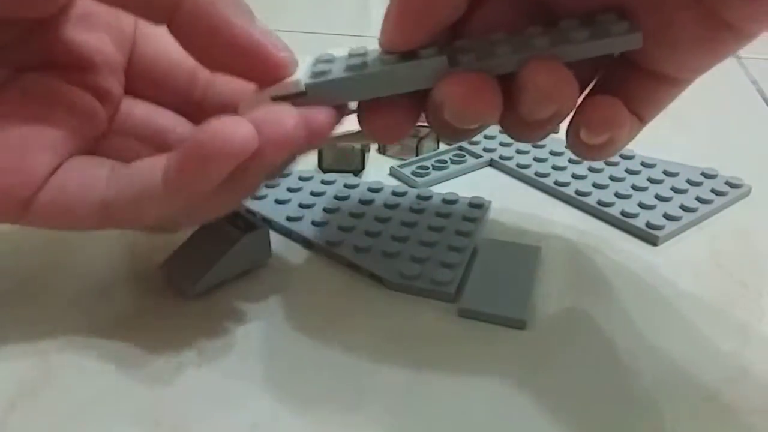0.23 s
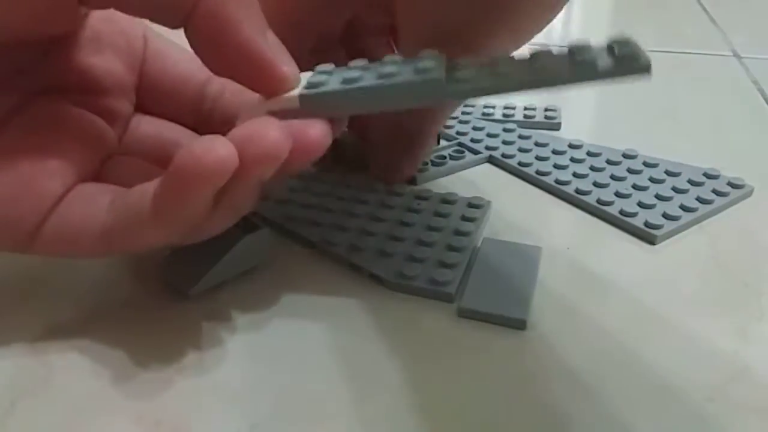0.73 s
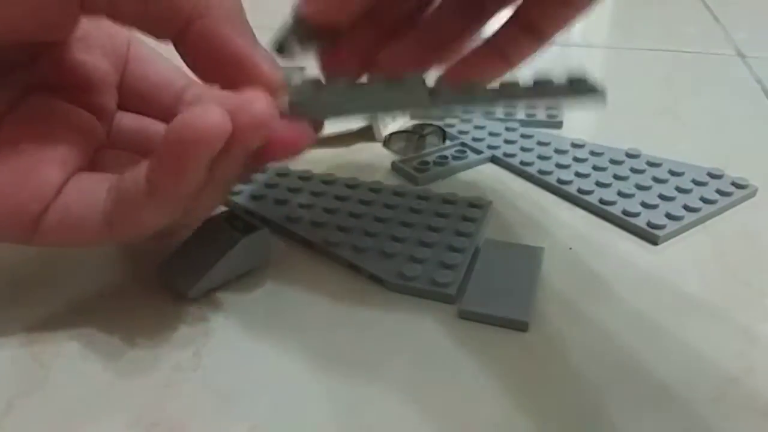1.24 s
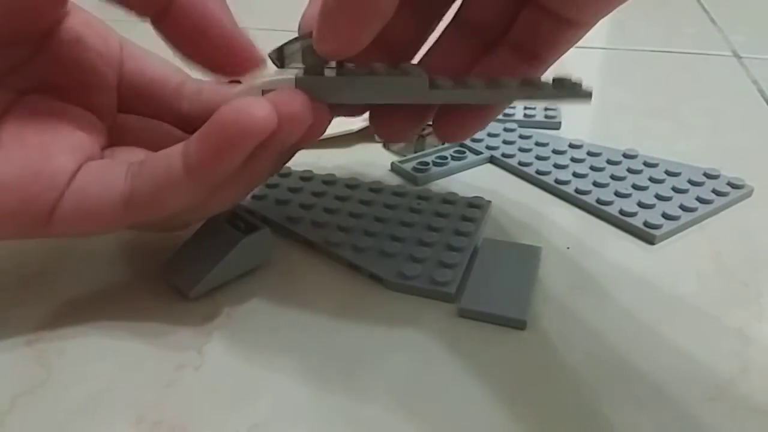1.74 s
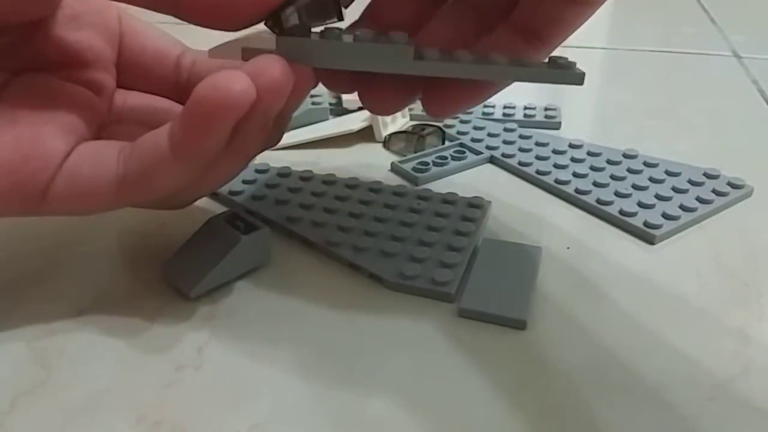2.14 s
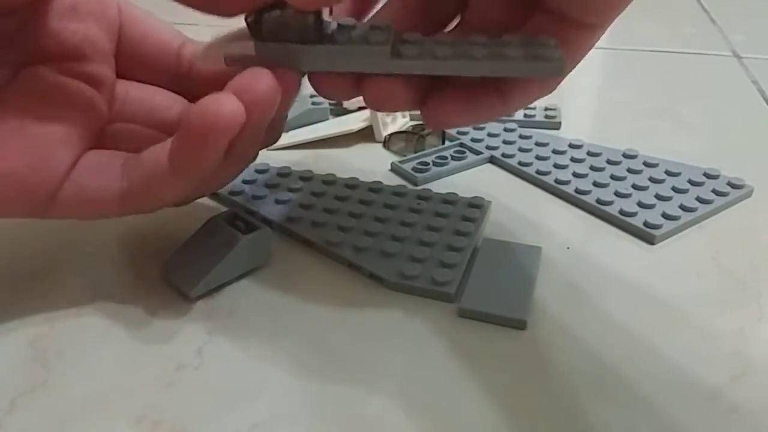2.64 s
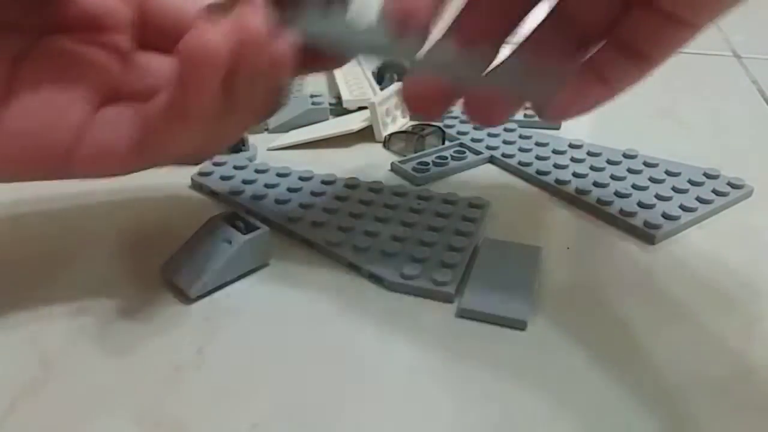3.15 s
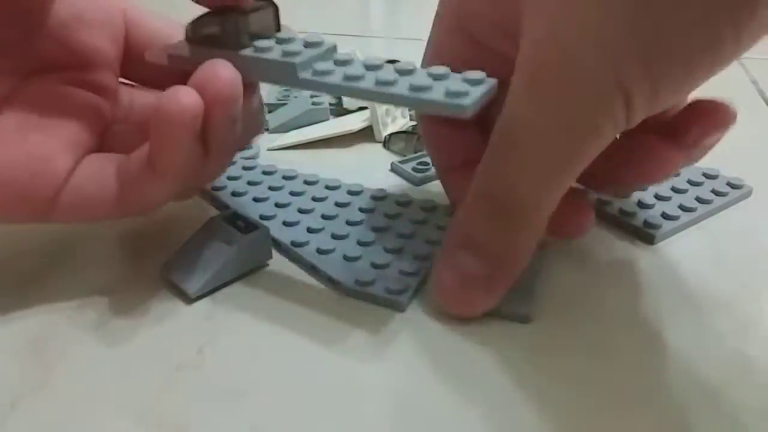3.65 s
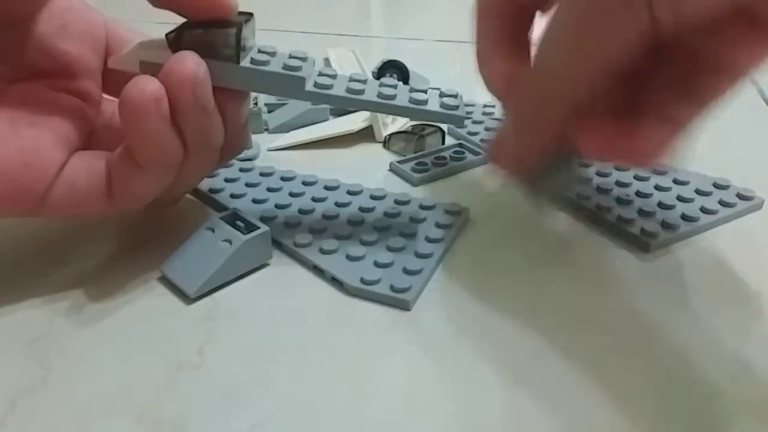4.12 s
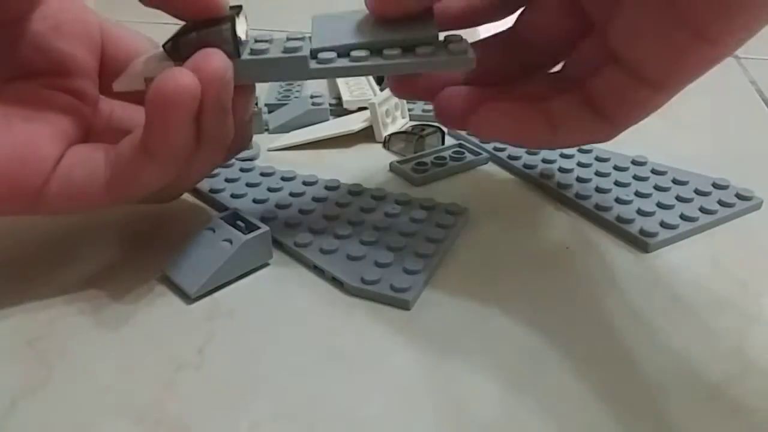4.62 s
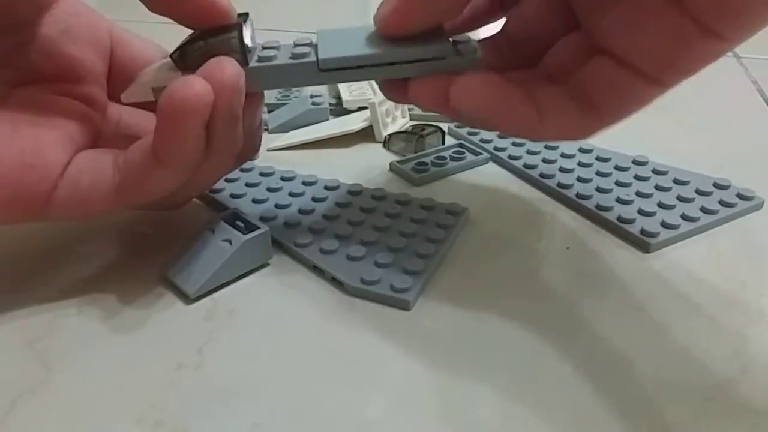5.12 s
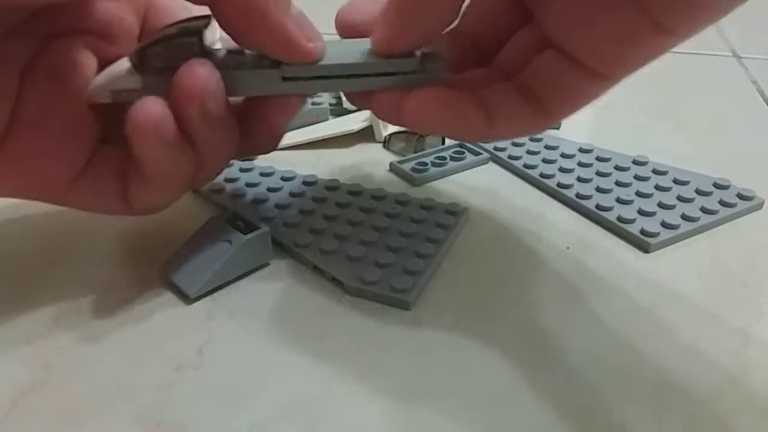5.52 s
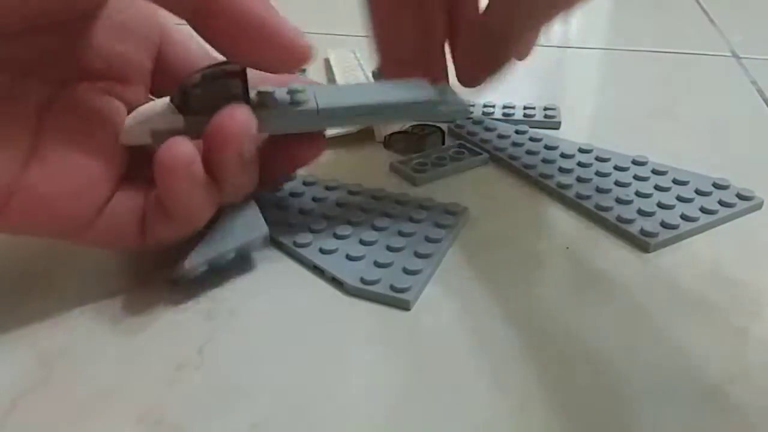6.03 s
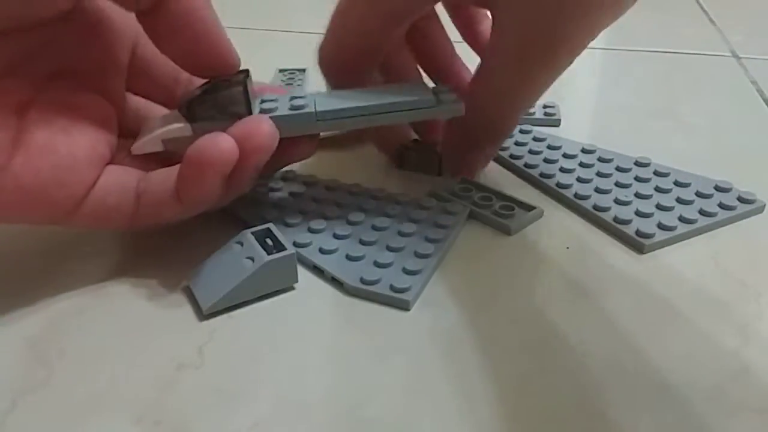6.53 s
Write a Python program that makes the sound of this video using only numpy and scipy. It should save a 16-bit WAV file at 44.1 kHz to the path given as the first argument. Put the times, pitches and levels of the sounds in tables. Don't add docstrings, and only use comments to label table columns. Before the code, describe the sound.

Toy plastic bricks are handled close to a stereo phone microphone in a quiet tiled room. A sharp clack comes early, then sparse ticks, a soft low scrape and chatter of a plate dragged on the floor, a bright snap as it presses home, and a rapid clattering cluster of pieces. Faint hum, distant motor and hiss lie underneath.

```python
import sys
import numpy as np
from scipy import signal
from scipy.fft import rfft, irfft, next_fast_len
from scipy.io import wavfile
from scipy.ndimage import uniform_filter1d

SR = 44100
rng = np.random.default_rng(int(sys.argv[2]) if len(sys.argv) > 2 else 0)


def boost(x):
    u = np.asarray(x, float) / 20
    return 10 ** u


def master(y):
    cut = np.clip(np.atleast_2d(y).T, -1, 1)
    pcm = np.round(cut * 32767)
    wavfile.write(sys.argv[1], SR, pcm.astype(np.int16))


N = 298557
T = np.arange(N) / SR

# start_s, peak_db, pitch_hz (strongest mode), body_modes_db, shell_modes_db
PILE_CLICKS = [(0.5434, -8.5, 7450, -8, 8), (0.683, -30.5, 7970, -27, -7), (0.6974, -32, 6500, -40, -8),
               (0.7174, -37, 4840, -16, -14), (0.7231, -28, 2010, -3.5, -12),
               (0.7626, -36.5, 2020, 9.5, 3.5), (1.29, -27.5, 5320, -7, -2), (1.3125, -31.5, 12350, -8, -7),
               (1.488, -48, 4250, 6.5, 6), (1.6021, -35, 5540, -28, -11), (1.6433, -23.5, 5790, -20.5, -5),
               (1.7465, -36.5, 5780, -33, -18)]
PLATE_CLICKS = [
    (3.5356, -33.5, 1690, -8, -21.5),
    (3.5442, -39, 1740, 20, -11),
    (3.5879, -33, 3080, 17, 2),
    (3.6368, -32, 3726, -13, -19.5),
    (3.7593, -45, 1900, -19, -24),
    (3.7722, -37.5, 6180, -5, -6),
    (3.8136, -43, 2090, -12, -6),
    (3.8432, -41.5, 1830, 10, 5),
    (3.9171, -30, 1970, -1, -9),
    (3.9914, -52, 7460, -42, -8),
]
TUMBLE_CLICKS = [(6.082, -22, 8880, -12, -10), (6.0954, -31, 7430, -9.5, -7.5),
                 (6.1054, -44.5, 7350, -13.5, -12), (6.1501, -38.5, 2440, -9.5, -23.5),
                 (6.1581, -38, 2640, -4.5, -24.5), (6.1664, -38.5, 4270, -16, -16),
                 (6.2018, -8, 6680, -17, 3), (6.2137, -15, 11360, -6, -18), (6.2234, -34, 2700, -4, -10.5),
                 (6.2369, -9, 6450, -47.5, -0.5), (6.2462, -23, 5670, -28, -10),
                 (6.2541, -37, 5630, -28.5, -14), (6.2598, -20, 5830, -49, 2),
                 (6.2626, -14, 7170, -61.5, 4.5), (6.371, -37.5, 3750, -3.5, 1.5),
                 (6.559, -53, 2680, -10, -20)]
FIDGET_CLICKS = [(0.0153, -18, 8240, -17, -18), (0.199, -51, 6000, -12, -1), (0.3337, -47, 7660, -17, -22),
                 (0.362, -42.5, 11700, -39, -14), (1.8392, -49.5, 5740, -26, -25),
                 (1.8967, -46.5, 5570, -33, -17.5), (1.9056, -54, 5770, -31, -1),
                 (1.9355, -43, 5640, -38, -33), (2.0458, -50, 5196, -14, -23),
                 (2.9772, -47.5, 8100, -5, -4.5), (3.1, -49, 11700, -16.5, -14),
                 (3.3483, -48.5, 7560, -35.5, -21.5), (3.357, -43.5, 9340, -34, -12)]
PRESS_CLICKS = [(4.4754, -27.5, 8460, -19, -8), (4.4974, -38.5, 3570, -15.5, -5),
                (4.8576, -42.5, 4480, 2.5, 1), (4.9671, -36, 3460, -13, 2.5), (4.9948, -36, 3940, -10, 0),
                (5.0588, -19, 9080, -22, -9), (5.0948, -35.5, 7460, -9, 1), (5.1565, -22, 8370, -53, -15),
                (5.1979, -6, 9070, -54, -1.5), (5.479, -55, 9260, -23.5, -12.5),
                (5.8232, -56, 1500, -3, 0.5), (5.909, -54.5, 8000, -25, -5),
                (5.939, -56.5, 10500, -29, -8.5), (5.8515, -35, 8500, -24, -8.5),
                (5.859, -37, 10820, -45, -15.5), (6.5324, -29.5, 11370, 0, -1)]
BOUNCE_CLICKS = [(.0181, -20, 7890, -14, -12), (.0212, -31, 5260, -12, -8), (.5455, -23, 5080, -20, -8),
                 (5.1994, -15, 9280, -30, -18), (6.2007, -28, 7500, -40, -10),
                 (6.2062, -24, 5900, -25, -10), (6.2172, -19, 8400, -15, -4),
                 (6.2155, -16, 11300, -18, -12), (6.211, -26, 3900, -12, -8), (4.9805, -44, 9000, -15, -3),
                 (6.111, -40, 8800, -10, -3), (5.1745, -44, 7700, -30, -8), (3.5635, -45, 2100, -3, -24),
                 (3.898, -52, 2560, -3, -18), (6.687, -56, 5600, -30, -20), (5.838, -52, 7000, -25, -5)]

# start_s, pitch_hz, level_db, t60_s further modes of struck parts that
PART_RINGS = [(.5432, 2900, -22.5, 0.0051), (.5432, 12900, -24, .008), (1.643, 2450, -40, 0.012),
              (3.10, 2110, -71.5, .061), (3.36, 2110, -70, 0.056), (3.5885, 6200, -30.5, 0.0066),
              (3.917, 1170, -51, 0.07), (5.1981, 7880, -12, 0.008), (5.1982, 12800, -24, 0.015),
              (6.196, 4600, -35, 0.011), (6.2091, 8370, -26, 0.042), (6.2138, 13900, -14.5, .016),
              (6.2138, 3920, -25.5, 0.027), (6.2386, 5645, -25, .045), (6.2642, 11300, -21, 0.018),
              (6.532, 14000, -41, 0.028), (6.2635, 6840, -20, 0.025), (6.247, 5645, -36, 0.064),
              (6.0815, 8900, -34, 0.038), (6.533, 11100, -42.5, 0.02), (3.6372, 3690, -37, .035),
              (4.4755, 12800, -36, .012), (.7235, 2030, -36, .025),
              (1.2902, 6270, -40, .012), (1.2902, 2120, -44, .015), (1.2902, 3900, -45, .012),
              (1.6435, 5160, -36, .015), (1.6435, 9710, -36, .008), (1.6023, 6100, -46, .012),
              (1.7467, 5060, -45, .013), (1.8394, 5100, -58, .012), (1.8969, 5100, -56, .012),
              (1.9357, 5100, -52, .012), (1.9357, 6090, -51, .012), (.0154, 9120, -30, .01),
              (.0154, 13100, -38, .012), (.0154, 5260, -38, .01), (.5446, 5080, -27, .016),
              (.5434, 6830, -29, .012), (6.2148, 11300, -20, .02), (6.2018, 14300, -24, .015),
              (3.5358, 2100, -46, .03), (3.5358, 2700, -49, .03), (3.5358, 3340, -50, .025),
              (3.5885, 1900, -48, .03), (3.6375, 1850, -47, .03), (3.7595, 1900, -54, .05),
              (3.9175, 2800, -46, .02), (3.9175, 3600, -48, .02), (6.535, 14050, -58, .2),
              (6.535, 11100, -60, .18), (.13, 5700, -66, .12), (6.2372, 9200, -30, .03),
              (6.2635, 9200, -38, .07), (.7235, 3900, -45, .02), (.7185, 11500, -48, .015),
              (6.2018, 11800, -26, .03), (6.082, 7300, -40, .03)]
SINGING_LINES = [
    (3.645, 3690, -57, .4),
    (5.208, 9300, -48, .38),
    (6.245, 5650, -45.5, .45),
    (6.22, 11280, -48, .35),
]
KNUCKLE_THUMPS = [
    (.543, 447, -32, 0.024),
    (.543, 250, -37, .03),
    (5.198, 197, -55, 0.072),
    (6.2137, 414, -48, 0.035),
    (6.2137, 750, -48, .04),
    (3.536, 700, -58, .05),
]

# start_s, length_s, peak_share (0-1 of length), peak_db, rubbing_part (0 body, 1 edge, 2 skin)
SLIDES = [(0, 0.25, .1, -66, 1.05), (.68, 0.13, .25, -65, 2), (1.78, .22, 0.47, -72, .9),
          (3.335, 0.059, 0.36, -64.5, 1.36), (3.535, 0.08, 0.34, -59, .02), (3.59, 0.079, .5, -62, 0.55),
          (3.73, 0.11, .4, -68.5, .1), (3.78, 0.098, 0.3, -69, 1.05), (3.885, 0.092, 0.22, -56, .1),
          (3.95, .09, 0.6, -64.5, 1.3), (4.12, 0.13, .45, -73.5, 2.3), (4.965, 0.08, .1, -71.5, 0.35),
          (4.976, 0.029, 0.55, -52, 1.1), (6.53, 0.041, 0.77, -60, .1), (5.061, 0.098, .7, -76, 1.6),
          (5.822, 0.054, .5, -63.5, 1.8), (6.015, .055, 0.43, -71, .85), (6.14, 0.062, 0.37, -53, 0.2),
          (6.2, 0.092, .3, -54, .1)]
# pitch_hz, level_db
RUB_COLOURS = [
    [(400, -24), (1100, -9), (1900, 1), (2400, -10), (2900, -6), (3700, 1), (4500, -12), (8000, -50.5)],
    [(2500, -41), (4500, -7.5), (6200, -0.5), (8200, -2), (9500, -10.5), (13000, -41)],
    [(6100, -41.5), (9600, -5), (12500, 0), (15200, -1), (16300, -40)],
]
# start_s, left_over_right_db
HAND_PLACES = [(0, 3.5), (.6, 1.5), (1.4, 2.5), (2, .5), (3.55, 1.5), (3.7, 0), (4.5, .5), (5.2, -1.5),
               (6.1, 0), (6.77, -.5)]

# pitch_hz, level_db
TAIL_COLOUR = [(200, 4.5), (1000, 1), (4000, -4.5), (8000, -7), (11000, -6), (13500, -5), (16000, -5)]
# pitch_hz, t60_s
TAIL_T60 = [(300, 0.17), (2000, 0.33), (6000, 0.39), (10000, .36), (13000, .3), (16000, 0.24)]
# delay_s, level_db
WALL_ECHOES = [
    (0.0163, 8.5),
    (0.0216, -1),
    (0.031, -4),
    (0.037, -0.5),
]

# peak_s, end_s, firing_hz, peak_db, fade_db_per_s
THROTTLE = [
    (0, 0.723, 44.86, -61, 28),
    (0.835, 1.35, 40.03, -65.5, 31.5),
    (1.6, 1.805, 40.82, -63.5, 45),
    (1.952, 2.404, 49, -67, 11),
]
# pitch_hz, level_db
HOUSE_MODES = [(85, -27), (98, -4.5), (135, -18.5), (160, 4), (180, 2.5), (200, -10), (225, -18),
               (247, -7.5), (294, -5), (318, -13.5), (340, -6), (362, -18.5), (400, -9), (450, -22.5)]
# start_s, end_s, pitch_hz, level_db
PIPE_WHINES = [
    (3.899, 4.1, 402, -80),
    (3.91, 4.103, 548, -74.5),
    (4.22, 4.797, 278.2, -74),
]
# start_s, level_db
RUMBLE_SWELL = [(0, -64.5), (.7, -61.5), (2.3, -68), (3.2, -72.5), (3.8, -67.5), (5.6, -69.5), (6.5, -68.5),
                (6.77, -71)]
# pitch_hz, level_db_per_hz
STREET_COLOUR = [(82, -29), (140, -3), (152, -15), (269, -19), (417, -25.5), (519, -30.5), (1500, -46.5),
                 (1950, -77)]
# pitch_hz, level_db_per_hz
DEEP_COLOUR = [(15, -62), (30, -16), (42, -2), (65, 0.5), (100, -3), (150, 0), (220, -32), (400, -81.5)]
# pitch_hz, level_db_per_hz
MIC_COLOUR = [(400, -31), (700, -8.5), (1500, -8), (3000, -10), (6000, -11), (10000, -12), (13500, -9),
              (16000, -12.5)]
# pitch_hz, level_db
FAINT_TOP = [(15650, 0), (15900, -40)]
# pitch_hz, level_db
PHONE_TOP = [(16500, 0), (16900, -70)]


def on_log(hz, table):
    points = np.array(table)
    return np.interp(np.log(np.maximum(hz, 1)), np.log(points[:, 0]), points[:, 1])


def level(x, db):
    return x * boost(db) / np.sqrt(np.mean(x ** 2))


def colour(x, table):
    n = next_fast_len(x.shape[-1])
    hz = np.arange(n // 2 + 1) * SR / n
    return irfft(rfft(x, n) * boost(on_log(hz, table)), n)[..., :x.shape[-1]]


def stereo_noise(table, alike_hz):
    mid, side = rng.standard_normal((2, N))
    side = colour(side, [(alike_hz / 8, -18), (alike_hz, 0)])
    return colour(np.array([mid + side, mid - side]), table)


def walk(rate):
    hold = int(SR / rate)
    steps = np.repeat(rng.standard_normal(N // hold + 1), hold)
    return 1.1 * uniform_filter1d(uniform_filter1d(steps, hold), hold)[:N]


def onset(x):
    x = np.minimum(x, 1)
    return x * x * (3 - 2 * x)


def add(out, start_s, x, lag):
    for channel, late in enumerate((max(lag, 0), max(-lag, 0))):
        i = int(start_s * SR) + late
        out[channel, i:i + x.shape[1]] += x[channel, :N - i]


def clicks(table, top_db, t60, low_t60, skew, left_db, lag, count=80):
    out = np.zeros((2, N))
    t = np.arange(900) / SR
    sides = np.array([[1], [-1]])
    for (start_s, db, hz, low_db, mid_db), u in zip(table, rng.random((len(table), 5, count))):
        f = 600 + 15900 * ((np.arange(count) + u[0]) / count) ** 1.5
        high_db = mid_db + top_db + 1.5 * np.log2(hz / 6000)
        base_db = on_log(f, [(600, low_db - 26), (1200, low_db - 9), (1700, low_db - 2), (2500, low_db),
                             (5500, mid_db + 1.5), (8000, mid_db), (13000, high_db),
                             (14500, high_db - 1.5), (16500, high_db - 12.5)])
        gain = boost(base_db) + np.exp(-.5 * (np.log(f / hz) / 0.063) ** 2)
        age = np.maximum(t - .002 * u[1][:, None] ** 6, 0)
        decay_s = on_log(f, [(1000, low_t60), (6000, t60)]) * (0.47 + 1.1 * u[2])
        turn = 0.39 * u[3] + skew * np.minimum(f / 3000, 1) * (u[4] - .5) * sides
        wave = np.sin(2 * np.pi * (f[:, None] * age + turn[:, :, None]))
        wave = wave * onset(age * f[:, None] / 1.6)
        fade = np.exp(-np.log(1000) * age / decay_s[:, None])
        x = np.sum(gain[:, None] * fade * wave, axis=1)
        x = x * (1 + 2.1 * np.exp(-t / 0.00098))
        x = x / np.abs(x).max(axis=1, keepdims=True)
        add(out, start_s, x * boost(db + left_db * sides), lag)
    return out


def floor_contacts():
    floor = dict(t60=0.014, low_t60=0.04, skew=0.57, lag=-6)
    pile = clicks(PILE_CLICKS, top_db=-10.5, left_db=0.05, **floor)
    plate = clicks(PLATE_CLICKS, top_db=-22, left_db=0.1, **floor)
    tumble = clicks(TUMBLE_CLICKS, top_db=-4.5, left_db=-0.13, **floor)
    return pile + plate + tumble


def hand_contacts():
    held = dict(t60=0.0052, low_t60=0.011, skew=0.51, lag=8)
    fidget = clicks(FIDGET_CLICKS, top_db=-4, left_db=-0.2, **held)
    press = clicks(PRESS_CLICKS, top_db=-9, left_db=0.1, **held)
    bounce = clicks(BOUNCE_CLICKS, top_db=-8, left_db=0.1, **held)
    return fidget + press + bounce


def rings(table, left_db, lag):
    out = np.zeros((2, N))
    rock_db = 4.5 * walk(160)
    for k, (start_s, hz, db, t60) in enumerate(table):
        t = T[:int(min(t60, .3) * SR) + 50]
        flutter = boost(rock_db[1500 * k:][:len(t)] * np.minimum(t / .01, 1))
        wave = np.sin(2 * np.pi * hz * t + 2 * np.log(flutter))
        x = flutter * wave * np.exp(-np.log(1000) * t / t60) * onset(t / .0003)
        add(out, start_s, x * boost(db + np.array([[left_db], [-left_db]])), lag)
    return out


def after_ring(table, ring_db, t60):
    return [(start_s, hz, db + ring_db, t60) for start_s, db, hz, *_ in table]


def ringing_plates():
    table = PART_RINGS + SINGING_LINES
    table = table + after_ring(PILE_CLICKS, ring_db=-22.5, t60=.02)
    table = table + after_ring(PLATE_CLICKS, ring_db=-15, t60=0.038)
    table = table + after_ring(TUMBLE_CLICKS, ring_db=-12, t60=0.027)
    table = table + after_ring(FIDGET_CLICKS, ring_db=-8, t60=0.016)
    table = table + after_ring(PRESS_CLICKS, ring_db=-15, t60=0.018)
    return rings(table, left_db=.3, lag=-1)


def slides():
    out = np.zeros((2, N))
    swell_db, fade_db, spread_db = 8, 10, 8
    for k, table in enumerate(RUB_COLOURS):
        slips = rng.random(N) < 3000 / SR
        grains = slips * rng.standard_normal(N) * boost(1.8 * rng.exponential(size=N))
        rub = colour(grains + .3 * rng.standard_normal((2, N)), table)
        rub = level(rub, 0) * boost(3 * walk(70))
        for start_s, length_s, share, db, part in SLIDES:
            i = slice(int(start_s * SR), int((start_s + length_s) * SR))
            x = (T[i] - start_s) / length_s
            gate = np.clip(np.minimum(x, 1 - x) * length_s / 0.012, 0, 1)
            shape_db = np.interp(x, [0, np.clip(share, .02, .98), 1], [-swell_db, 0, -fade_db])
            out[:, i] += gate * rub[:, i] * boost(db + shape_db - spread_db * abs(part - k) - 3.0)
    return out


def room(dry, wet_db, onset_s):
    t = np.arange(26000) / SR
    shape = 0.96 * np.clip((t - onset_s) / .02, 0, 1) + 0.5 * np.clip(t / 0.0049, 0, 1)
    for delay_s, db in WALL_ECHOES:
        shape = shape + boost(db) * np.exp(-.5 * ((t - delay_s) / 0.0012) ** 2)
    tail = 0
    for hz in 250 * 2 ** np.arange(0, 6.5, .5):
        band = colour(rng.standard_normal((2, len(t))), [(hz / 1.2, -40), (hz / 1.425, -3), (hz, 0),
                                                         (hz * 1.247, -3), (hz * 3.5, -40)])
        tail = tail + band * boost(on_log(hz, TAIL_COLOUR) - 60 * t / on_log(hz, TAIL_T60))
    return signal.fftconvolve(dry, tail * shape * boost(wet_db), axes=1)[:, :N]


def motorbike():
    columns = np.transpose(THROTTLE)
    burst = np.minimum(np.searchsorted(columns[1], T), len(THROTTLE) - 1)
    peak, end, hz, db, fade = columns[:, burst]
    hz = uniform_filter1d(hz * (1 - .025 * (T - peak)), size=1000)
    rise_db_per_s = 73
    db = db - np.where(T < peak, rise_db_per_s * (peak - T), fade * (T - peak))
    db = db - 300 * np.maximum(T - end, 0)
    phase = 2 * np.pi * np.cumsum(hz) / SR
    tones = 0
    for k in range(2, 11):
        gain = boost(on_log(k * hz, HOUSE_MODES) + 2.5 * walk(3.4))
        tones = tones + gain * np.sin(k * phase + 6 * rng.random())
    return tones * uniform_filter1d(boost(db), size=1000)


def mains_hum():
    waver = 1 + .36 * np.sin(2 * np.pi * 2.91 * T + 2.6 + .5 * walk(1.5))
    hum = boost(-61) * np.sin(2 * np.pi * 120.13 * T) * waver
    mode = colour(rng.standard_normal(N), [(60, -81), (100, -18), (113, -4.5), (121, 13.5),
                                           (131, -5.5), (145, -18.5), (200, -79.5)])
    return hum + level(mode, -70)


def pipe_whine():
    out = np.zeros(N)
    for start_s, end_s, hz, db in PIPE_WHINES:
        tone = boost(4 * walk(25)) * np.sin(2 * np.pi * hz * T + 1.4 * walk(30))
        out = out + boost(db) * np.clip(np.minimum(T - start_s, end_s - T) / 0.021, 0, 1) * tone
    return out


def street_rumble():
    swell_db = np.interp(T, *np.transpose(RUMBLE_SWELL)) + 1.6 * walk(6)
    rumble = level(stereo_noise(STREET_COLOUR, alike_hz=1256), 0) * boost(swell_db)
    return rumble + level(stereo_noise(DEEP_COLOUR, alike_hz=250), -72)


def house():
    return (mains_hum() + pipe_whine()) * boost(np.array([[-.4], [.4]])) + street_rumble()


def microphone_hiss():
    return level(colour(rng.standard_normal((2, N)), MIC_COLOUR), -76.5)


def scene():
    thumps = rings(KNUCKLE_THUMPS, left_db=2.8, lag=3)
    knocks = floor_contacts() + hand_contacts() + slides() + thumps
    plates = ringing_plates()
    reverb = room(knocks + .6 * plates, wet_db=-40.0, onset_s=0.012)
    background = colour(microphone_hiss() + reverb, FAINT_TOP)
    left_over_right_db = np.interp(T, *np.transpose(HAND_PLACES))
    pan = boost(left_over_right_db / 2 * np.array([[1], [-1]]))
    return pan * (knocks + plates) + background + motorbike() + house()


def low_pass(x):
    return signal.sosfilt(signal.butter(12, 16930, fs=SR, output="sos"), x)


def record(dry):
    mix = colour(dry, PHONE_TOP)
    return low_pass(mix)


dry = scene()
out = record(dry)
master(out)
```